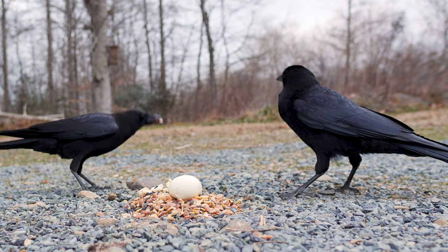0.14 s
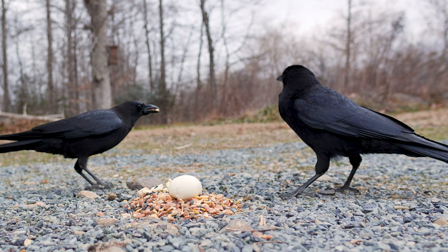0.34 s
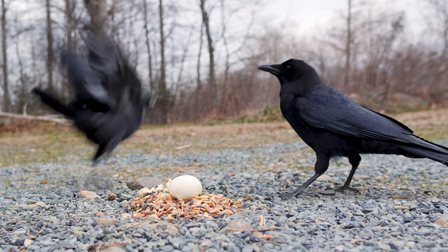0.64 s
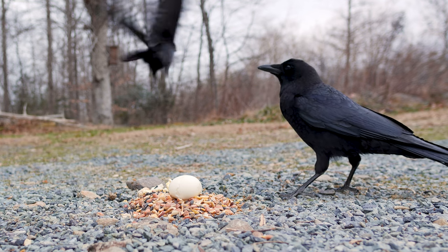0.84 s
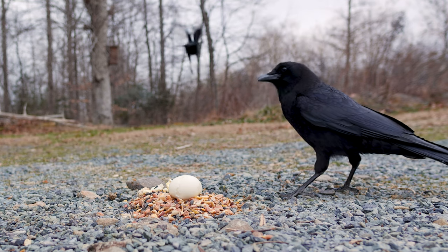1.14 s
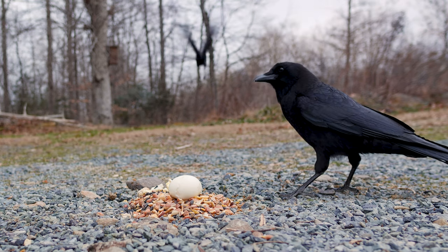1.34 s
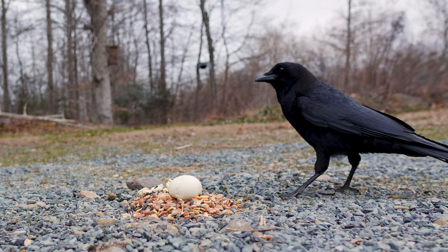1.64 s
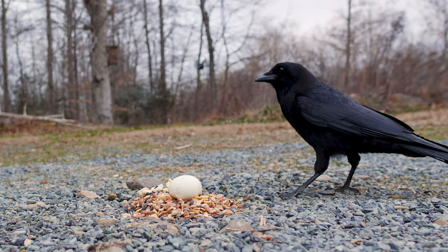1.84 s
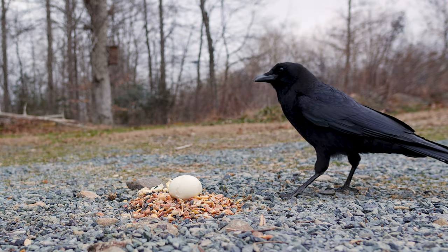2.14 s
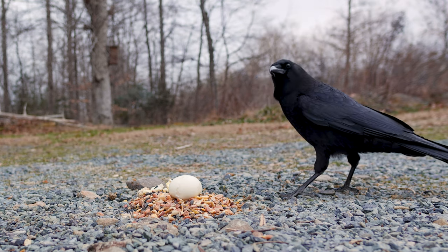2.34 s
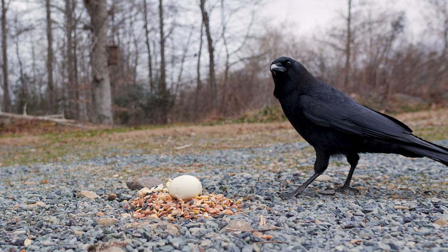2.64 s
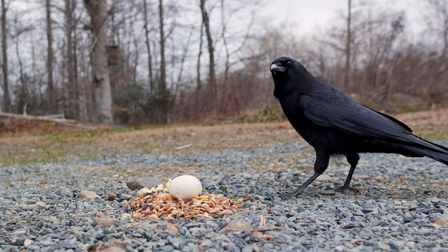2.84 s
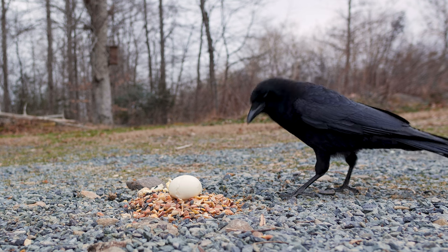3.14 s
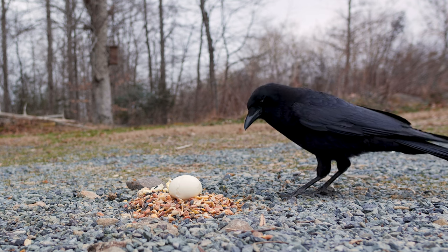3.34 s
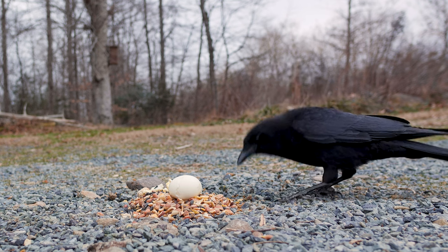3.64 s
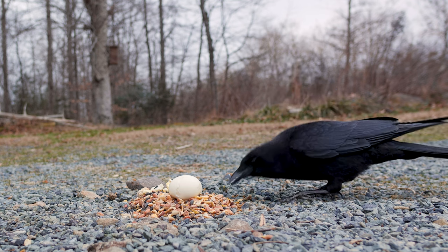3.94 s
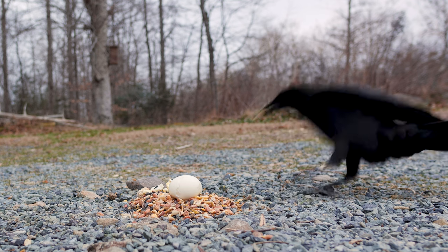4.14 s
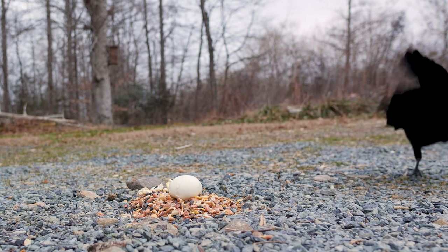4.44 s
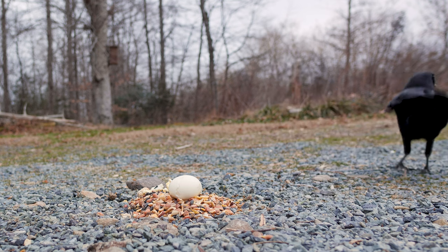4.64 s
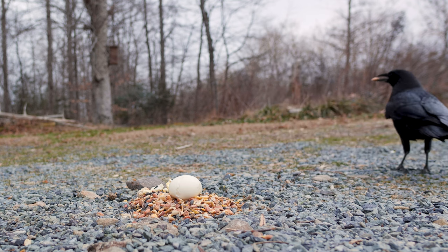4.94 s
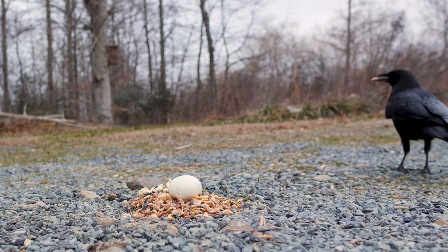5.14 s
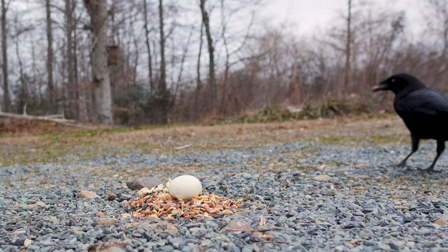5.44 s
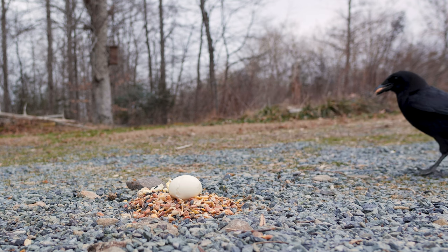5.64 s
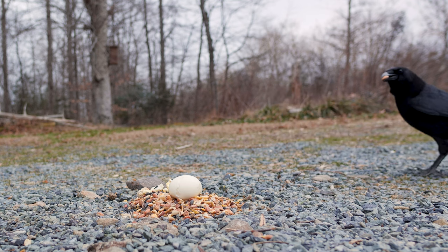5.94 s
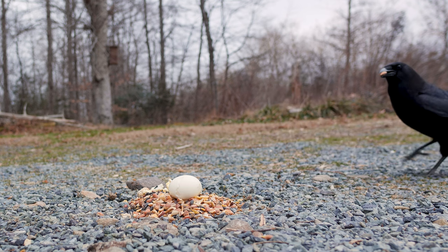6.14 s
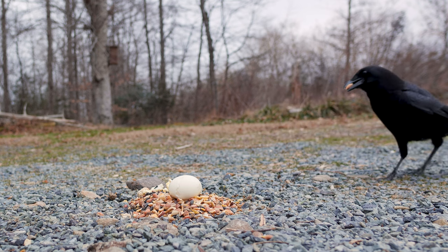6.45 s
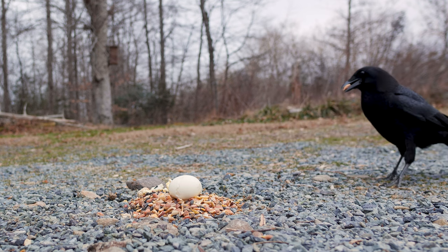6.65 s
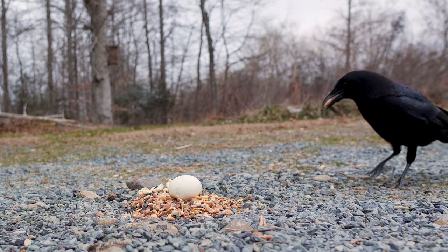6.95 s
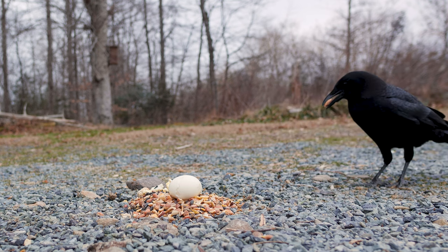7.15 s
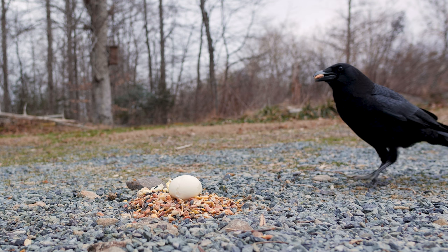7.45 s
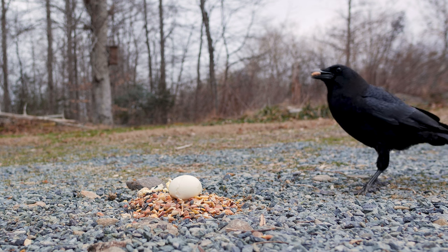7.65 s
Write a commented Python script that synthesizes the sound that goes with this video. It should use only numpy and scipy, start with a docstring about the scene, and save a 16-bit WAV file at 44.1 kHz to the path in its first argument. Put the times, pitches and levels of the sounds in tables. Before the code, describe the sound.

Close stereo microphone near the ground, crows on gravel. An early take-off rattles pebbles and swishes feathers into the distance, with soft low puffs of air on the microphone. Thin whistles and trills sound from trees. Midway, a sharp woody peck and a hop crunch the stones. Two raspy caws ring with long woodland echo, followed by sparse taps, quick chirping and a few small low chucks.

```python
"""Over a far rush that grows slightly, small birds chirp and sing at the edge of a winter wood.
Soon beaks and claws tap on seed and gravel; one crow takes off, scattering grit, and flaps away.
Lone chirps and trills follow, then the other crow snatches at the seed and hops back over the stones.
A crow caws twice among the trees, and near the end a small bird gives a few low chucks.
Filtered noise makes air, grit and wings; gliding tones make birds; damped tones make taps; pulses make caws."""
import sys
import numpy as np
from scipy import signal
from scipy.fft import rfft, irfft, next_fast_len
from scipy.io import wavfile
from scipy.ndimage import uniform_filter1d

SR = 44100
rng = np.random.default_rng(int(sys.argv[2]) if len(sys.argv) > 2 else 0)


def master_out(mix):
    """Clip the mix to full scale and print it as 16-bit PCM to the path in sys.argv[1]."""
    frames = np.transpose(np.atleast_2d(mix))
    ceiling = np.clip(frames, -1, 1)
    pcm = np.round(ceiling * 32767).astype(np.int16)
    wavfile.write(sys.argv[1], SR, pcm)


N = 343539
CUTOFF_HZ = 15900  # top of the sound


def from_db(db):
    """Turn decibels into gain."""
    return 10 ** (np.asarray(db) / 20)


def rms_one(x):
    """Scale a signal to unit power."""
    return x / np.sqrt(np.mean(x ** 2) + 1e-20)


def columns_at(rows, t):
    """Read each column of a curve at the times t."""
    s, *columns = np.transpose(rows)
    return [np.interp(t, s, c) for c in columns]


def add(out, s, sound, pan_db=0):
    """Mix a sound in at a time and a place; positive pan_db makes the left louder."""
    i = round(s * SR)
    part = sound[..., max(0, -i):N - i]
    first = max(0, i)
    out[:, first:first + part.shape[-1]] += part * from_db([[pan_db / 2], [-pan_db / 2]])


def over_hz(points, size):
    """Spread a curve over the FFT's frequencies, with straight lines on a log pitch scale."""
    hz, value = np.transpose(points)
    grid = np.arange(size // 2 + 1) * SR / size
    return np.interp(np.log(np.maximum(grid, 1)), np.log(hz), value)


def coloured(x, spectrum):
    """Filter a signal by a spectrum in dB, then scale it to unit power."""
    size = next_fast_len(x.shape[-1])
    filtered = irfft(rfft(x, size) * from_db(over_hz(spectrum, size)), size)
    return rms_one(filtered[..., :x.shape[-1]])


def stereo_noise(size, alike):
    """White noise that the two channels partly share."""
    mid, side = rng.standard_normal((2, size))
    alike = np.clip(alike, 0, 1)
    return rms_one(np.sqrt(1 + alike) * mid + np.sqrt(1 - alike) * side * [[1], [-1]])


def drift(size, rate):
    """Wander between random values, drawn at the given rate per second with a spread of 1."""
    knots = rng.standard_normal(int(size / SR * rate) + 2)
    return np.interp(np.arange(size) * rate / SR, np.arange(len(knots)), knots)


def resonance(x, hz, width_hz):
    """Let through one band of pitches, at unit gain in its middle."""
    edges = np.clip([hz - width_hz / 2, hz + width_hz / 2], 20, .48 * SR)
    return signal.sosfilt(signal.butter(2, edges, "band", fs=SR, output="sos"), x)


def note(hz, edge):
    """A pure tone along a pitch curve, fading in and out over a share of its length."""
    tone = np.sin(2 * np.pi * np.cumsum(hz) / SR)
    return np.sqrt(2) * tone * signal.windows.tukey(len(hz), np.clip(edge, .05, 1))


def woods(x, near_db, near_t60, far_db, far_t60, alike):
    """Ground and near trunks scatter a short echo, the deeper wood a long one."""
    t = np.arange(int(1.2 * SR)) / SR
    near, far = (rms_one(from_db(-60 * t / t60)) / np.sqrt(len(t)) for t60 in (near_t60, far_t60))
    fading = from_db(near_db) * near + from_db(far_db) * far
    echo = stereo_noise(len(t), alike) * fading * (t > .003)
    return x + signal.fftconvolve(x, echo, axes=1)[:, :N]


def swells(rows):
    """Gain of overlapping bursts, each gaining 20 dB in its rise time and losing 20 dB in its fall time."""
    t = np.arange(N) / SR
    power = 0
    for s, db, rise, fall in rows:
        steps = np.maximum((s - t) / rise, (t - s) / fall)
        power = power + from_db(db - 20 * np.minimum(steps, 10)) ** 2
    return np.sqrt(power)


# Tone colour of the far rush. Each row: pitch in Hz, relative level per Hz in dB.
RUSH_COLOUR = [(15, -28), (25, -7.5), (117, -17.5), (236, -7.5), (263, -8.5), (326, -4), (354, -18),
               (384, -8), (476, -9.5), (624, -1), (1400, -23), (5000, -31), (6050, -30), (8360, -31),
               (16000, -35)]
# Loudness of the rush over time. Each row: time in seconds, level in dB.
RUSH_LOUDNESS = [(0, -68), (6.2, -65), (7.8, -65)]
# How alike left and right are in the rush. Each row: pitch in Hz, likeness from 0 to 1.
RUSH_LIKENESS = [(30, 0.32), (100, 0.79), (300, 0.47), (650, 0.68), (1500, 0.35), (4000, 0.49),
                 (14000, 0.23)]


def far_rush():
    """The open air's far rush is noise whose left-right likeness depends on pitch."""
    t, size = np.arange(N) / SR, next_fast_len(N)
    mid, side = rfft(rng.standard_normal((2, size)))
    alike = np.clip(over_hz(RUSH_LIKENESS, size), 0, 1)
    spectrum = np.sqrt(1 + alike) * mid + np.sqrt(1 - alike) * side * [[1], [-1]]
    air = irfft(spectrum, size)[:, :N]
    loudness = from_db(columns_at(RUSH_LOUDNESS, t)[0])
    return loudness * coloured(air, RUSH_COLOUR) * from_db([[-.7], [.7]])


# Puffs of air. Each row: peak time in seconds, level in dB, rise in seconds, fall in seconds.
AIR_PUFFS = [(.78, -49.5, 0.036, .13), (.95, -60.5, .04, .25), (1.93, -45, .06, 0.32),
             (2.38, -51, 0.14, 0.21), (2.85, -67, 0.56, 0.49)]
# Tone colour of the puffs, mostly deep. Each row: pitch in Hz, relative level per Hz in dB.
PUFF_COLOUR = [(12, 4), (25, -3.5), (40, -13), (65, -26.5), (150, -42.5), (1000, -94)]


def air_puffs():
    """Puffs of air on the microphone are swells of low noise, nearly unrelated left and right."""
    noise = coloured(stereo_noise(N, alike=0.11), PUFF_COLOUR)
    return swells(AIR_PUFFS) * noise * from_db([[-2], [4]])


# Low chucks of one bird. Each row: start in seconds, length in seconds, middle pitch in Hz, level in dB.
LOW_CHUCKS = [(7.167, 0.012, 2130, -67), (7.283, 0.0097, 2060, -64), (7.412, 0.023, 2276, -51),
              (7.554, 0.015, 2248, -53)]


def chucks():
    """Short, low notes arch in pitch, with faint overtones at two and three times the pitch."""
    out = np.zeros((2, N))
    for s, length, hz, db in LOW_CHUCKS:
        arc = hz * (1 - 0.18 * np.linspace(-1, 1, int(length * SR)) ** 2)
        overtones = from_db(-22) * note(2 * arc, edge=0.62) + from_db(-27) * note(3 * arc, edge=1)
        add(out, s, from_db(db) * (note(arc, edge=0.6) + overtones), pan_db=-1.5)
    return out


def trill(length, first, last, swing, rate, db, swell_db, throb=0.55, quiver=0.121):
    """The pitch swings quickly about a line, and the sound is loudest at the foot of each swing."""
    t = np.arange(int(length * SR)) / SR
    warble = -np.cos(2 * np.pi * rate * t)
    hz = np.linspace(first, last, len(t)) + swing * (warble + quiver * drift(len(t), 196.3))
    loudness = from_db(db + swell_db * (t / length - .5)) * (1 - throb * warble) / 2
    return loudness * note(hz, edge=0.42)


# Lone trills. Each row: start in seconds, length in seconds, first pitch in Hz, last pitch in Hz,
# swing in Hz, warbles per second, level in dB, change of level from start to end in dB.
LONE_TRILLS = [(2.498, 0.093, 4690, 4400, 547, 140, -55.5, 2),
               (2.655, 0.085, 4420, 4100, 750, 166, -60.5, -5),
               (4.076, 0.089, 7660, 7700, 725, 38, -36.5, -4)]


def trills():
    """Short trills come from nearly straight ahead."""
    out = np.zeros((2, N))
    for s, *shape in LONE_TRILLS:
        add(out, s, trill(*shape), pan_db=-.7)
    return out


def chirp(length, hz, db, shape, scoop=0.193, quiver=0.0094):
    """A chirp follows an arc of pitch, swelling and fading."""
    u, (first, last) = np.linspace(0, 1, int(length * SR)), shape
    arc = hz * np.polyval(np.polyfit([0, .5, 1], [first, 1, last], 2), u)
    swoop = 1 - scoop * (first < 1) * np.exp(-10 * u)  # a chirp with a low first pitch swoops up to its arc
    return from_db(db) * note(arc * swoop * (1 + quiver * drift(len(u), 500)), edge=0.85)


# shapes of a chirp: first and last pitch of the arc as multiples of the middle one
RISE, ARCH, FLICK = (.86, 1.04), (.8, .77), (1.22, .82)
# Runs of rising chirps. Each row: start in seconds, period of the later notes in seconds,
# first pitch in Hz, level in dB, left over right in dB.
CHIRP_RUNS = [(.515, 0.083, 8100, -63.5, -11), (2.147, 0.085, 7300, -62, -6.5),
              (3.856, .083, 8000, -60, -11), (6.597, .085, 7900, -61.5, -8)]
# The number of chirps in each run, one for each row above.
CHIRP_COUNTS = [10, 5, 10, 10]
# note lengths at first and at last, extra time spread over the early gaps (seconds); share of slowness kept per note
RUN_FIRST_S, RUN_LAST_S, RUN_LINGER_S, RUN_HURRY = .075, .034, .06, .5
RUN_FADE_DB, RUN_SOFT_START_DB = 0.8, -9  # lost per note; the first note is softer
RUN_LAST_HZ, RUN_SINK = 5800, .65  # share of the distance to the last pitch kept per note


def chirp_runs():
    """A run starts high and slow and settles towards a quick, even repeat on a lower pitch."""
    out = np.zeros((2, N))
    for (s, period, first_hz, db, pan_db), count in zip(CHIRP_RUNS, CHIRP_COUNTS):
        for k in range(count):
            slow = RUN_HURRY ** k
            length = RUN_LAST_S + (RUN_FIRST_S - RUN_LAST_S) * slow
            hz = RUN_LAST_HZ + (first_hz - RUN_LAST_HZ) * RUN_SINK ** k
            note_db = db - RUN_FADE_DB * k + RUN_SOFT_START_DB * (k == 0)
            start = s + k * period + RUN_LINGER_S * (1 - slow)
            add(out, start, chirp(length, hz, note_db, RISE), pan_db)
    return out


FALL_S, WHISTLE_FADE_S = .013, 0.046  # time constant of the fall; fading in and out together


def whistle(length, hz, db, fall, quiver=.009):
    """A thin tone drops quickly onto a pitch and holds it."""
    t = np.arange(int(length * SR)) / SR
    pitch = hz * (1 + fall * np.exp(-t / FALL_S) + quiver * drift(len(t), 500))
    return from_db(db) * note(pitch, edge=WHISTLE_FADE_S / length)


# Single chirps that rise. Each row: start in seconds, length in seconds, middle pitch in Hz, level in dB,
# left over right in dB.
RISING_CHIRPS = [(-.012, 0.037, 7300, -57.5, 1), (.28, 0.047, 7180, -70, -8), (1.302, 0.043, 7280, -56, 2),
                 (2.158, .052, 7050, -46, 1), (3.379, .041, 7390, -56.5, 0), (4.578, 0.054, 7100, -65, 3)]
# Single chirps that rise and sink again. Each row: the same columns as above.
ARCHED_CHIRPS = [(2.472, .045, 6060, -46, -1), (6.474, 0.041, 7550, -63, -4)]
# Thin falling whistles. Each row: start in seconds, length in seconds, held pitch in Hz, level in dB,
# left over right in dB.
FALLING_WHISTLES = [(2.927, .042, 7580, -50, 0), (3.437, 0.032, 7340, -62.5, 1),
                    (3.985, .112, 7220, -41, 0)]


def lone_chirps():
    """Single calls rise, arch, or fall onto a held pitch."""
    out = np.zeros((2, N))
    for rows, shape in ((RISING_CHIRPS, RISE), (ARCHED_CHIRPS, ARCH)):
        for s, length, hz, db, pan_db in rows:
            add(out, s, chirp(length, hz, db, shape), pan_db)
    for s, length, hz, db, pan_db in FALLING_WHISTLES:
        add(out, s, whistle(length, hz, db, fall=.3), pan_db)
    return out


# Songs. Each row: start in seconds, level in dB, warbles per second in the buzz.
BIRD_SONGS = [(-.113, -57, 107), (.387, -61, 92), (3.55, -56.5, 110)]
# The whistle of a song: seconds into the song, length in seconds, pitch in Hz, level against the song in dB,
# fall as a share of the pitch.
WHISTLE_PART = (.003, .06, 5970, -6, .08)
# When the buzz sounds: seconds into the song, length in seconds.
BUZZ_TIME = (.083, .175)
# The buzz: first pitch in Hz, last pitch in Hz, swing in Hz, growth from start to end in dB.
BUZZ_PART = (4800, 4520, 680, 8)
# The flick: seconds into the song, length in seconds, middle pitch in Hz, level against the song in dB.
FLICK_PART = (.281, .018, 3600, -14)
SONG_PAN_DB = -11.5


def songs():
    """A bird on the right repeats a phrase: a nearly level whistle, a swelling buzz, a flick downwards."""
    out = np.zeros((2, N))
    for s, db, rate in BIRD_SONGS:
        lag, length, hz, note_db, fall = WHISTLE_PART
        add(out, s + lag, whistle(length, hz, db + note_db, fall), SONG_PAN_DB)
        lag, length = BUZZ_TIME
        first, last, swing, swell_db = BUZZ_PART
        add(out, s + lag, trill(length, first, last, swing, rate, db, swell_db), SONG_PAN_DB)
        lag, length, hz, note_db = FLICK_PART
        add(out, s + lag, chirp(length, hz, db + note_db, FLICK), SONG_PAN_DB)
    return out


def small_birds():
    """The singers sit among the trees; the chucking bird is nearer and drier."""
    singers = chirp_runs() + lone_chirps() + songs() + trills()
    distant = woods(singers, near_db=-6, near_t60=0.19, far_db=-11.5, far_t60=.6, alike=0.27)
    return distant + woods(chucks(), near_db=-3.0, near_t60=0.07, far_db=-24, far_t60=0.39, alike=.4)


# Grit scattered by the take-off and shifting under the feet. Each row: peak time in seconds, level in dB,
# rise in seconds, fall in seconds.
GRIT_BURSTS = [(.72, -56.5, .2, .2), (.76, -40.5, 0.057, 0.088), (.91, -49, 0.35, 0.42),
               (1.11, -55, .06, 0.14), (1.285, -64, .04, .12), (1.835, -72, .03, .08),
               (3.387, -57.5, 0.012, 0.066), (4.075, -59.5, .035, 0.46), (4.245, -58, 0.064, .3),
               (4.33, -48.5, .07, .07), (4.39, -64, .15, .15), (4.453, -42, 0.016, 0.029),
               (4.54, -58.5, 0.16, .1), (4.698, -55.5, .015, .1), (4.75, -55.5, .04, .04),
               (5.385, -60, 0.021, 0.027), (5.697, -54, .02, 0.035), (7.095, -64.5, 0.023, 0.037)]
# Tone colour of the grit. Each row: pitch in Hz, relative level per Hz in dB.
GRIT_TONE = [(200, -28), (500, -1.5), (900, -2), (1700, -8), (4400, -1), (7500, 8), (10200, 1.5),
             (12000, 5), (12700, -21), (16000, -16)]


def grit(grains_per_s=1100, spread_db=3.5, rustle=0.87):
    """Tiny collisions of seed and grit, each from its own side, sound over a soft rustle."""
    sizes = from_db(spread_db * np.minimum(rng.exponential(1, N), 4)) * rng.choice([-1, 1], N)
    hits = rng.random(N) < grains_per_s / SR
    grains = sizes * hits * (1 + .5 * rng.standard_normal((2, N)))
    mixture = rms_one(grains) + rustle * stereo_noise(N, alike=0.76)
    return swells(GRIT_BURSTS) * coloured(mixture, GRIT_TONE) * from_db([[-.7], [.7]])


# Touches of beak and claws on seed and stones. Each row: start in seconds, peak level in dB, pitch in Hz.
TOUCHES = [(.615, -40, 7800), (.709, -38, 7360), (0.7474, -25.5, 7400), (0.764, -28.5, 7300),
           (.872, -33.5, 8400), (.901, -29, 10200), (.929, -34, 3660), (.934, -30, 6640),
           (1.0445, -34, 7400), (1.219, -40, 10800), (1.394, -48, 10900), (2.3876, -48, 4200),
           (3.385, -48.5, 6000), (3.576, -45.5, 6100), (4.073, -42.5, 3200), (4.0976, -32, 3750),
           (4.2443, -31, 5000), (4.388, -34.5, 8800), (4.394, -40, 7300), (4.411, -35, 9100),
           (4.456, -33, 6370), (4.4632, -28, 6620), (4.525, -38.5, 6300), (4.548, -39, 7600),
           (4.688, -40, 5800), (4.738, -38.5, 10900), (4.745, -37.5, 10600), (5.375, -33, 3380),
           (5.383, -30, 4100), (6.91, -52.5, 7050), (7.082, -49.5, 2500), (7.094, -48.5, 6140)]
# Ringing of a struck pebble or seed. Each row: multiple of its pitch, level in dB,
# time to fade by 60 dB in seconds.
PEBBLE_RING = [(.58, -10, .004), (.93, -8, .005), (1.08, -7, .005), (1.47, -9, .004)]


def taps(crack=0.74, crack_t60=0.015):
    """Each touch is a dry crack, coloured by the stone, and a few quickly damped tones."""
    out, t = np.zeros((2, N)), np.arange(int(.04 * SR)) / SR
    for s, db, hz in TOUCHES:
        ring = 0
        for ratio, level, t60 in PEBBLE_RING:
            mode_hz = min(ratio * hz, CUTOFF_HZ) * rng.uniform(0.87, 1.01)
            ring = ring + from_db(level - 60 * t / t60) * np.sin(2 * np.pi * mode_hz * t)
        snap = stereo_noise(len(t), alike=0.64) * from_db(-60 * t / crack_t60)
        edges = np.clip([0.45 * hz, 1.52 * hz + 2000], 100, 13000)
        band = signal.butter(2, edges, "band", fs=SR, output="sos")
        tap = signal.sosfilt(band, ring + crack * snap)
        add(out, s, from_db(db) * tap / np.abs(tap).max(), pan_db=rng.normal(-3.5, 1))
    return out


# Ringing of the beak. Each row: pitch in Hz, relative level in dB, time to fade by 60 dB in seconds.
BEAK_RING = [(950, -13, 0.023), (1330, -3, 0.034), (1490, 0, 0.031), (1655, -4, 0.039), (2310, -12, .02),
             (4020, -9, .015)]
KNOCK_S, KNOCK_DB, KNOCK_ATTACK_S = 4.094, -33.5, 0.0022


def knock():
    """The beak rings briefly, like wood, as it stabs into the heap of seed."""
    out, t = np.zeros((2, N)), np.arange(int(.08 * SR)) / SR
    ring = sum(from_db(db - 60 * t / t60) * np.sin(2 * np.pi * hz * t) for hz, db, t60 in BEAK_RING)
    attack = np.minimum(t / KNOCK_ATTACK_S, 1) ** 2
    add(out, KNOCK_S, from_db(KNOCK_DB) * attack * ring, pan_db=-4.0)
    return out


FLIGHT_S, WINGBEAT_S, WINGBEATS = .758, .179, 6  # first downstroke, period, number
FLIGHT_DB, RECEDING_DB_PER_S, RECEDING_DB_PER_S2 = -48, 11, 18  # the bird gathers speed as it leaves
STROKE_HALF_S, STROKE_HZ, STROKE_HZ_PER_S = .02, 2030, 360  # the swish rises as the bird speeds up
UPSTROKE_LAG_S, UPSTROKE_HALF_S, UPSTROKE_DB, UPSTROKE_HZ = .051, .016, -4, 2450


def flight():
    """Even wingbeats have a downstroke and a softer upstroke each, fading with distance."""
    strokes = []
    for t in WINGBEAT_S * np.arange(WINGBEATS):
        db = FLIGHT_DB - RECEDING_DB_PER_S * t - RECEDING_DB_PER_S2 * t ** 2
        strokes.append((FLIGHT_S + t, STROKE_HALF_S, db, STROKE_HZ + STROKE_HZ_PER_S * t))
        strokes.append((FLIGHT_S + t + UPSTROKE_LAG_S, UPSTROKE_HALF_S, db + UPSTROKE_DB, UPSTROKE_HZ))
    return strokes


# Single flicks of a wing. Each row: peak time in seconds, half length in seconds, level in dB,
# pitch of the swish in Hz.
SINGLE_FLICKS = [(.657, .014, -64.5, 2630), (0.712, .014, -54.5, 2500), (.892, 0.03, -56, 2130),
                 (3.407, .015, -66, 2200), (4.245, .022, -65.5, 2050), (4.325, .016, -56.5, 4360),
                 (4.471, .009, -67, 2500)]
# Tone colour of a swish. Each row: multiple of the swish pitch, relative level per Hz in dB.
SWISH_COLOUR = [(.1, -16), (.25, -6.5), (.6, -13), (.76, 2), (1.15, 3), (1.55, -5), (2.4, -24), (5, -14.5)]


def wings():
    """Air hisses through the flight feathers, swelling and fading with each stroke."""
    out = np.zeros((2, N))
    for s, half, db, hz in flight() + SINGLE_FLICKS:
        u = np.linspace(-3, 3, int(6 * half * SR))  # time in half lengths from the peak
        colour = [(ratio * hz, level) for ratio, level in SWISH_COLOUR]
        swish = coloured(stereo_noise(len(u), alike=1.0), colour)
        add(out, s - 3 * half, from_db(db) * np.exp(-u ** 2 / 2) * swish, pan_db=-.5)
    return out


CAW_ATTACK_S, CAW_ATTACK_DB, CAW_RELEASE_S, CAW_RELEASE_DB = .022, -27, 0.029, -7
# roughness 0-1 of the hoarse and the clear voice; time it takes to clear; length of the broken ending
HOARSE, CLEAR, CLEARING_S, BREAK_S = .92, .37, .08, .075
# the throat opens partway through a caw
BEAK_NARROW_DB, BEAK_WIDE_DB, BEAK_OPEN_S, BEAK_OPENING_S = -7.5, 4.5, .19, 0.058


def caw_gesture(s, length, db, fade_db_per_s, hoarse_s, pitch):
    """A caw starts hoarse, clears, opens its throat partway, and breaks up at its end."""
    t = np.arange(int(length * SR)) / SR
    left = length - t
    attack_db = CAW_ATTACK_DB * np.exp(-t / CAW_ATTACK_S)
    release_db = CAW_RELEASE_DB * np.exp(-left / CAW_RELEASE_S)
    level_db = db - fade_db_per_s * t + attack_db + release_db
    clear = np.clip(np.minimum(t - hoarse_s, left - BREAK_S) / CLEARING_S + .5, 0, 1)
    rough = HOARSE + (CLEAR - HOARSE) * clear
    opened = (1 + np.tanh((t - BEAK_OPEN_S) / BEAK_OPENING_S)) / 2
    opening_db = BEAK_NARROW_DB + (BEAK_WIDE_DB - BEAK_NARROW_DB) * opened
    return columns_at(pitch, s + t)[0], level_db, rough, opening_db


# Resonances of the crow's throat. Each row: pitch in Hz, width in Hz, level in dB,
# dB gained per dB of opening.
THROAT_BANDS = [(1300, 338, 0.5, 0.18), (1690, 237, 0.5, -0.36), (1972, 380, -4, 1.4), (2716, 340, -7.5, 1),
                (3246, 380, -22, -1), (4620, 1900, -26.5, 0.04), (5670, 820, -17.5, 0.37),
                (6900, 1420, -24, 0.47)]


def caw(hz, level_db, rough, opening_db, jitter=0.0434, shimmer=0.55, rasp=1.0, flutter=330,
        wobble=0.016, pulse_hz=5200, hiss=0.47, full_db=-40, dull=0.97):
    """Uneven pulses of the syrinx, with a rasp in each cycle and hoarse air on top, sound through the throat."""
    size = len(hz)
    unsteady = jitter * drift(size, flutter) + wobble * drift(size, 69.95)
    phase = 2 * np.pi * np.cumsum(hz * (1 + rough * unsteady)) / SR
    pulses = sum(np.cos(k * phase) / np.sqrt(1 + (k * hz / pulse_hz) ** 6) for k in range(1, 17)) / 3
    air = (1 + np.cos(phase)) * rng.standard_normal(size)
    uneven_pulses = pulses * (1 + shimmer * rough * drift(size, 700))
    source = uneven_pulses + rasp * rough * air + hiss * resonance(air, 6600, 7800)
    tilt_db = dull * np.minimum(level_db - full_db, 0)  # per octave: a weak voice is a dull one
    voice = from_db(-19) * resonance(air, 656, 270)     # a faint low huff
    for k, (centre, width, db, share) in enumerate(THROAT_BANDS):
        gain = from_db(db + share * opening_db + tilt_db * max(np.log2(centre / 1500), 0))
        voice = voice + (-1) ** k * gain * resonance(source, centre, width)
    # even out the loudness over 25 ms, so that level_db alone sets it
    steady = voice / np.sqrt(np.abs(uniform_filter1d(voice ** 2, size=1100)) + 1e-12)
    return from_db(level_db) * steady


# The two caws. Each row: start in seconds, length in seconds, level in dB, fading in dB per second,
# seconds into the caw when the hoarse start is half cleared.
TWO_CAWS = [(5.165, .6, -37.5, 8, .21), (5.933, .38, -36, 9, 0.031)]
# The first caw's pitch scoops up, then sags. Each row: time in seconds, pitch in Hz.
FIRST_CAW_PITCH = [(5.165, 405.7), (5.207, 551.3), (5.215, 566.0), (5.353, 563.0), (5.377, 547.4),
                   (5.581, 515.6), (5.629, 529.4), (5.645, 511.7), (5.765, 504.6)]
# The second caw's pitch scoops up, sags and collapses. Each row: time in seconds, pitch in Hz.
SECOND_CAW_PITCH = [(5.933, 397.5), (5.959, 526.0), (5.975, 585.4), (6.033, 637.6), (6.187, 571.5),
                    (6.245, 533.3), (6.287, 423.4), (6.313, 424.2)]


def crow_calls():
    """Two caws come from the trees, a little to the left, with a long echo."""
    out = np.zeros((2, N))
    for row, pitch in zip(TWO_CAWS, (FIRST_CAW_PITCH, SECOND_CAW_PITCH)):
        add(out, row[0], caw(*caw_gesture(*row, pitch)), pan_db=2.0)
    return woods(out, near_db=-11, near_t60=.3, far_db=-7.5, far_t60=1.1, alike=.55)


def scene():
    """The crows on the gravel are close and nearly dry; the calls come from the wood."""
    background = far_rush() + air_puffs() + small_birds()
    gravel = grit() + taps() + knock() + wings()
    close = woods(gravel, near_db=-8, near_t60=.03, far_db=-17, far_t60=.35, alike=.3)
    return background + close + crow_calls()


def record(dry, notch_width_hz=14, hum_hz=60):
    """A hum filter cuts narrow notches in the bass, and a steep filter cuts the top."""
    for k in range(1, 9):
        notch = signal.iirnotch(k * hum_hz, k * hum_hz / notch_width_hz, fs=SR)
        dry = signal.lfilter(*notch, dry)
    return signal.sosfilt(signal.ellip(10, .2, 70, CUTOFF_HZ, fs=SR, output="sos"), dry)


dry = scene()
out = record(dry)
master_out(out)
```